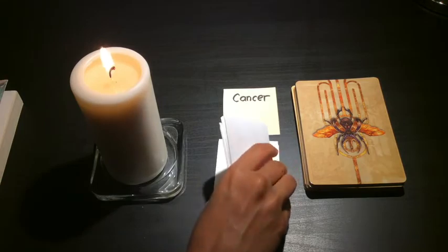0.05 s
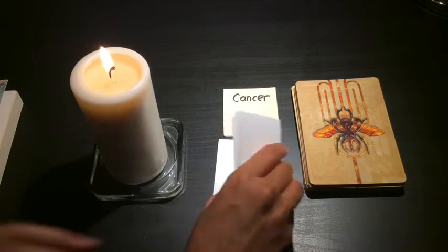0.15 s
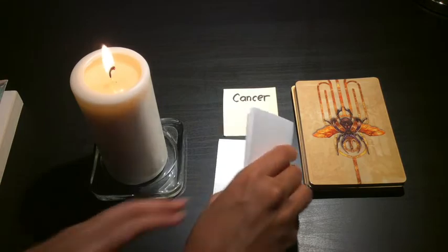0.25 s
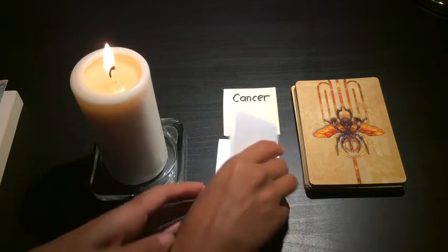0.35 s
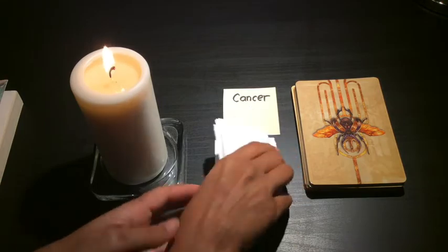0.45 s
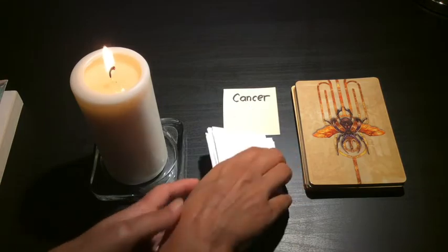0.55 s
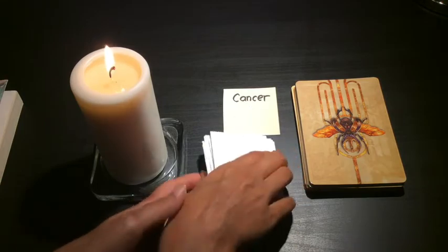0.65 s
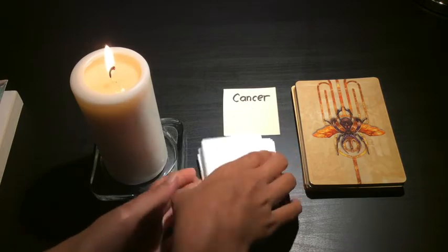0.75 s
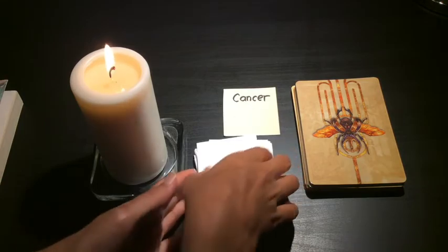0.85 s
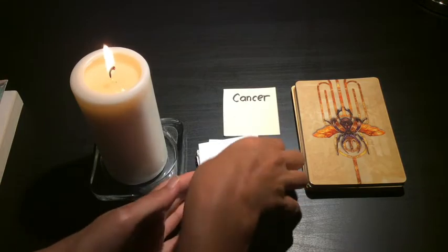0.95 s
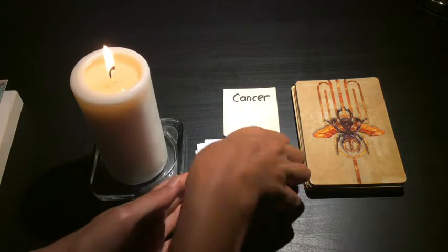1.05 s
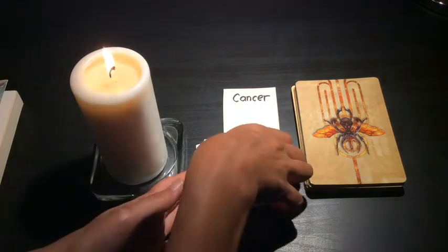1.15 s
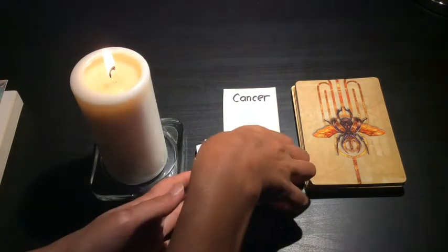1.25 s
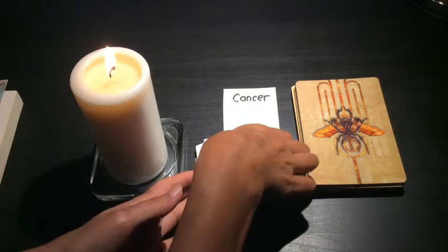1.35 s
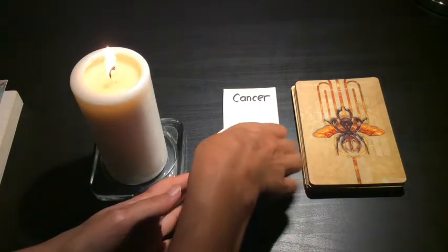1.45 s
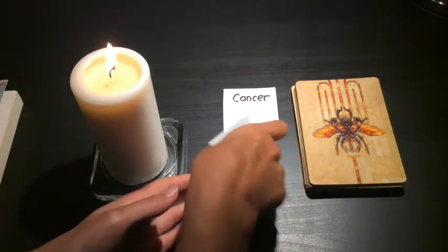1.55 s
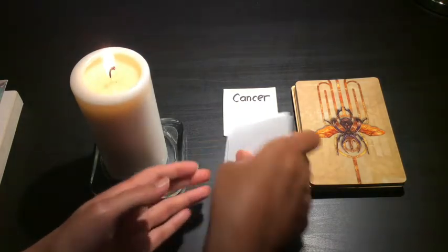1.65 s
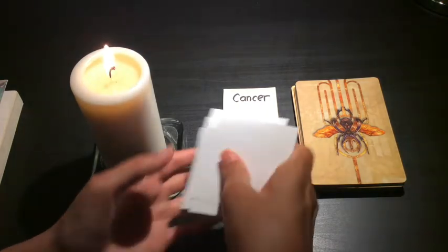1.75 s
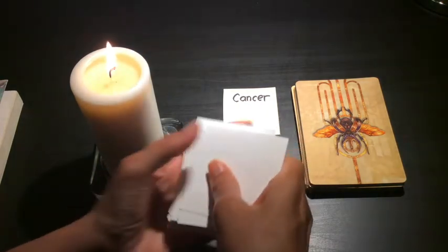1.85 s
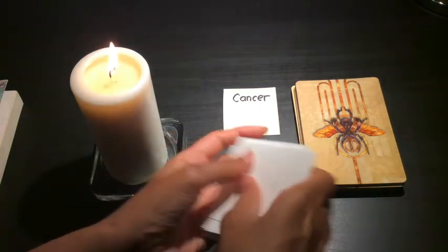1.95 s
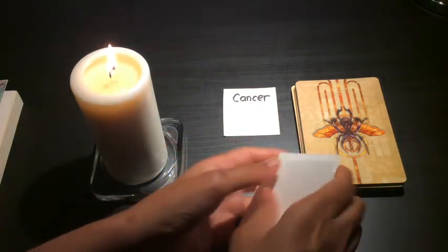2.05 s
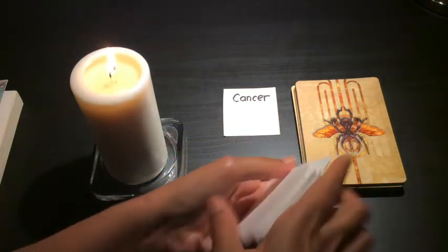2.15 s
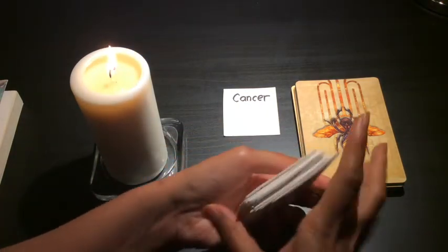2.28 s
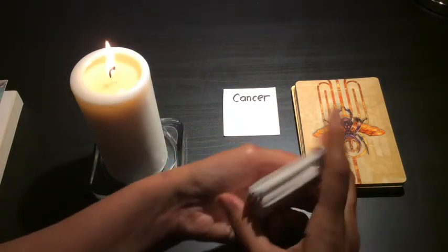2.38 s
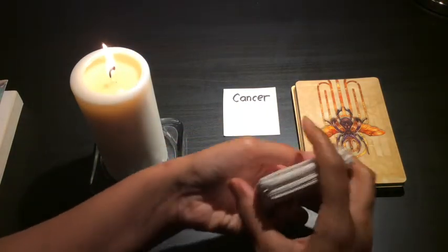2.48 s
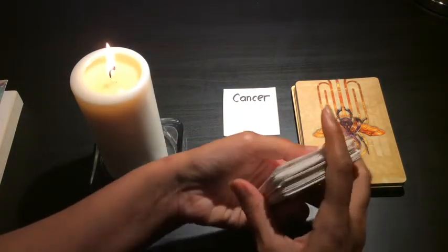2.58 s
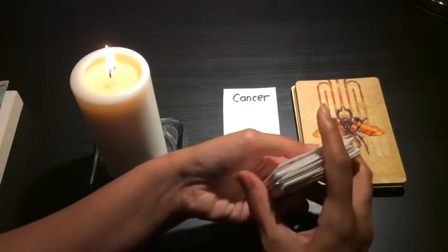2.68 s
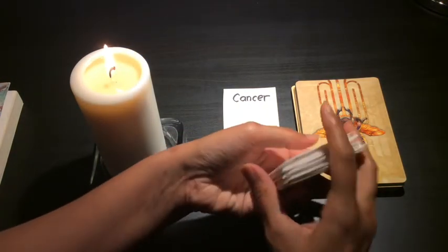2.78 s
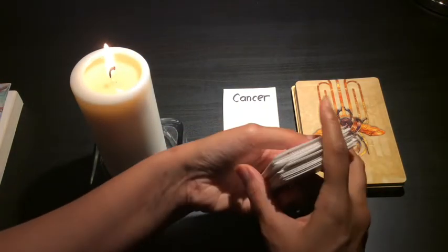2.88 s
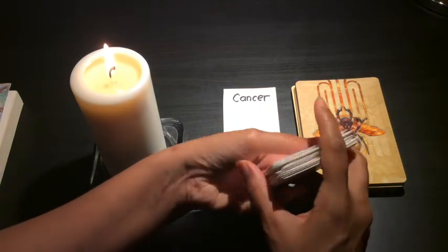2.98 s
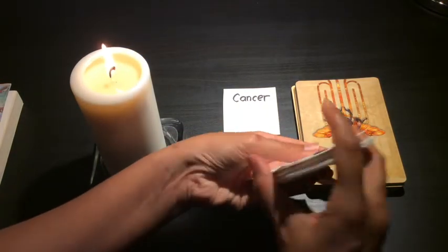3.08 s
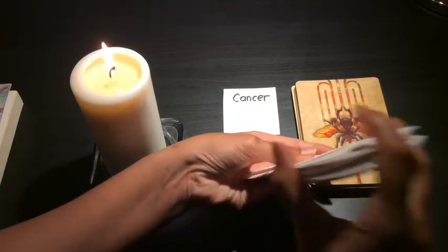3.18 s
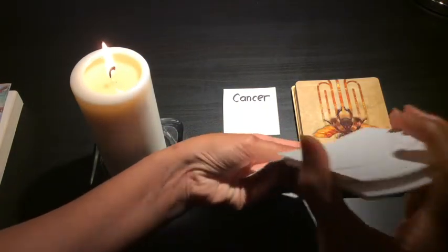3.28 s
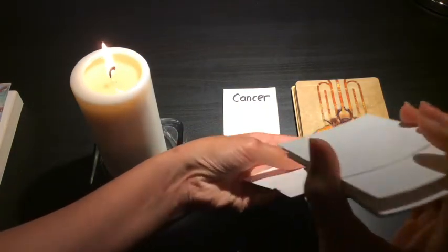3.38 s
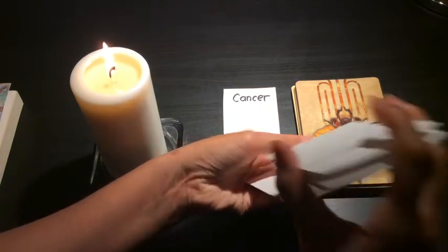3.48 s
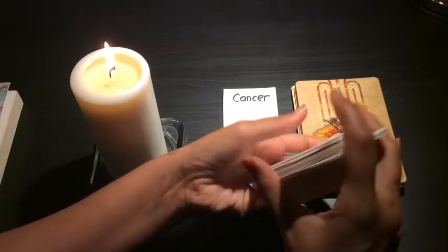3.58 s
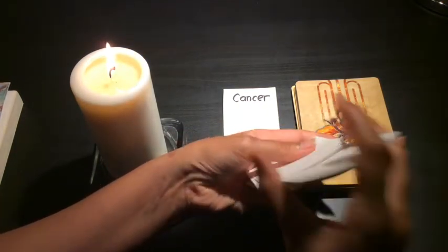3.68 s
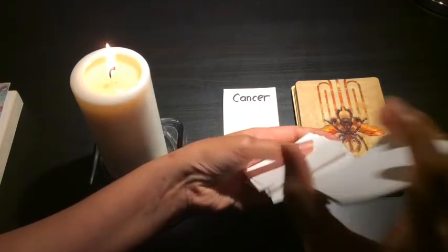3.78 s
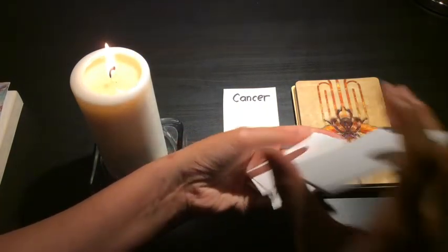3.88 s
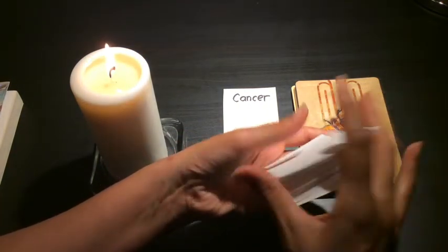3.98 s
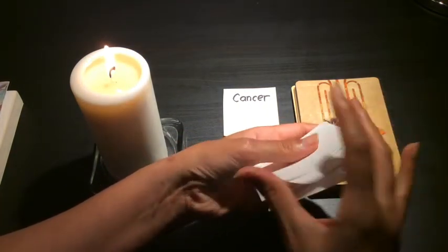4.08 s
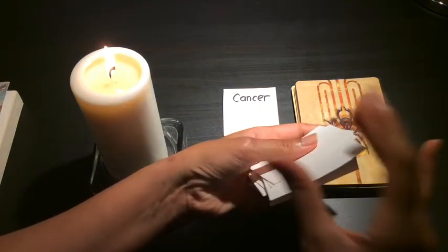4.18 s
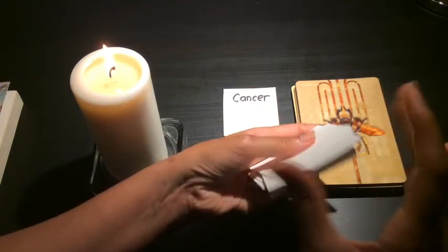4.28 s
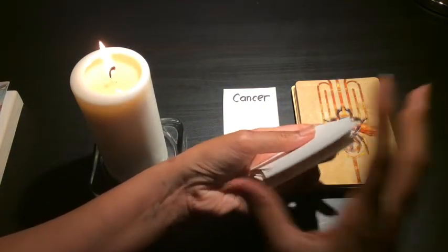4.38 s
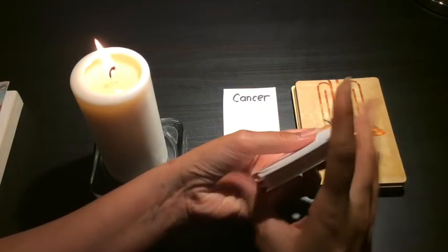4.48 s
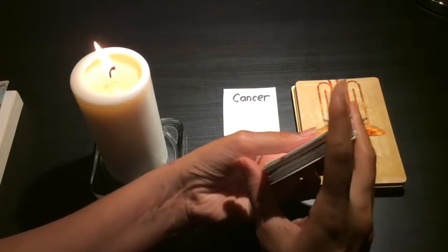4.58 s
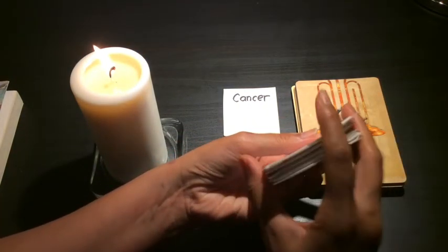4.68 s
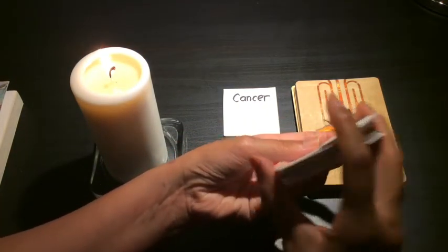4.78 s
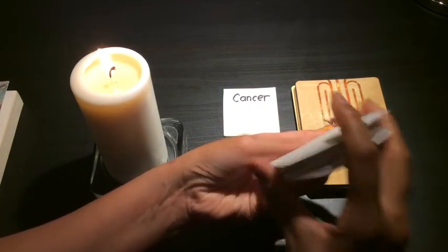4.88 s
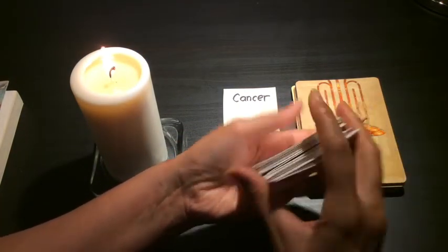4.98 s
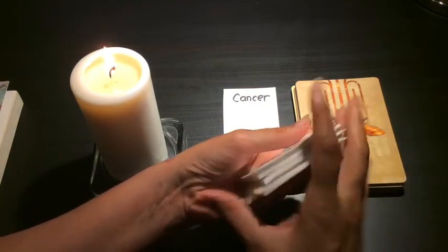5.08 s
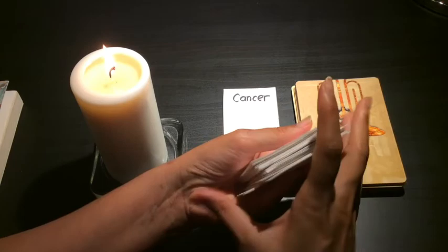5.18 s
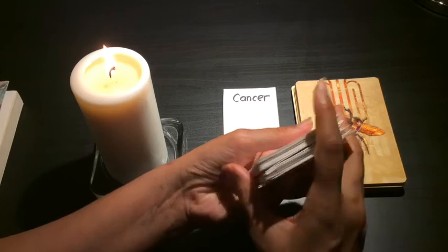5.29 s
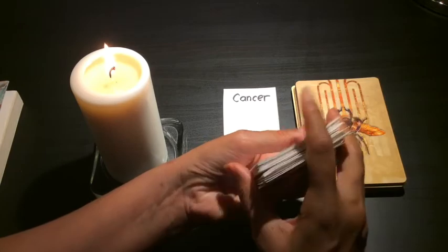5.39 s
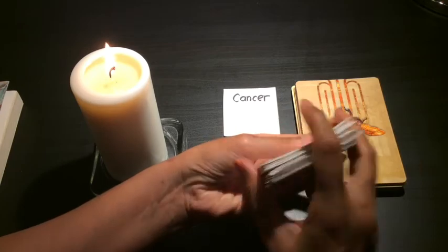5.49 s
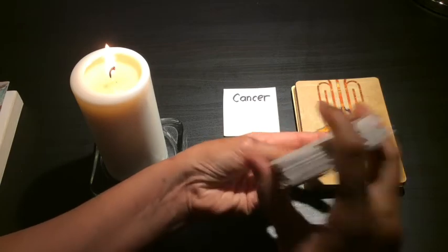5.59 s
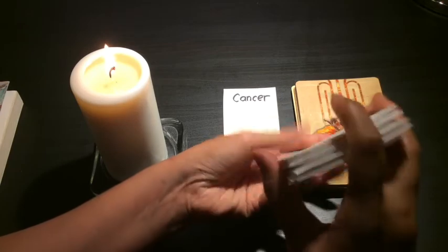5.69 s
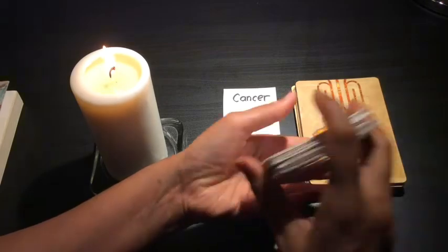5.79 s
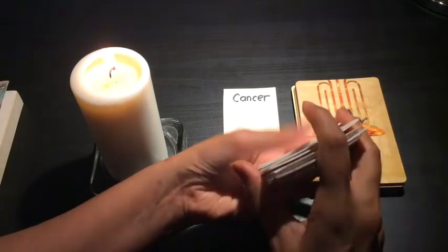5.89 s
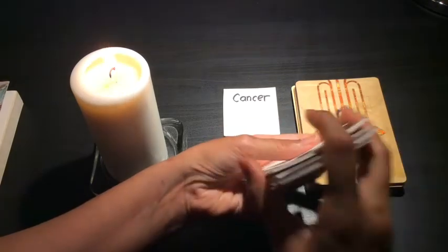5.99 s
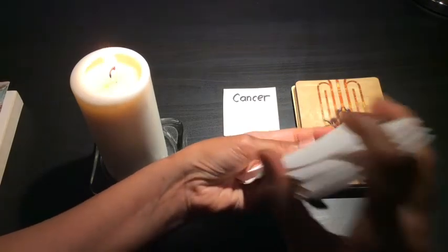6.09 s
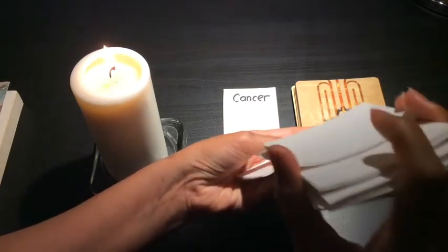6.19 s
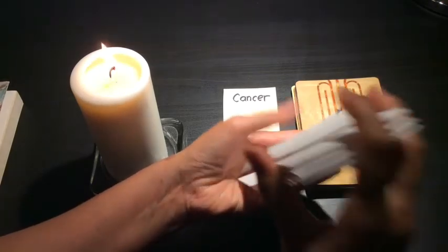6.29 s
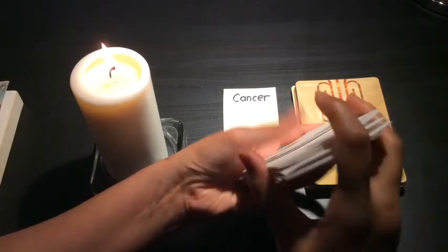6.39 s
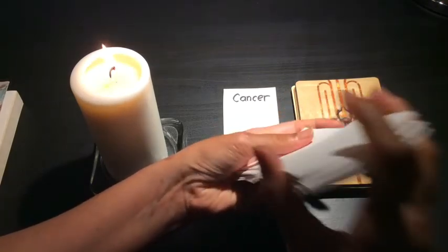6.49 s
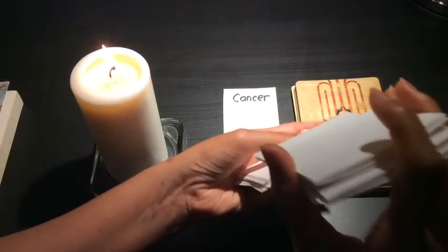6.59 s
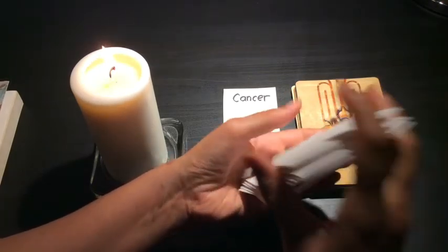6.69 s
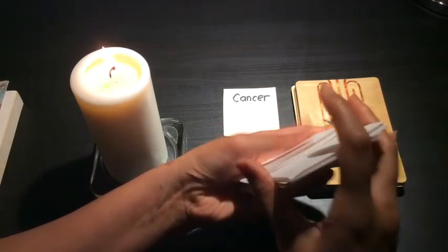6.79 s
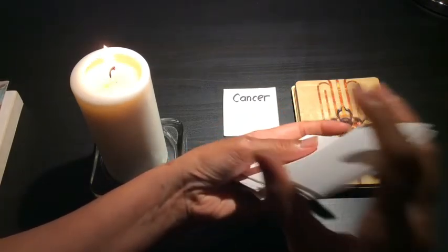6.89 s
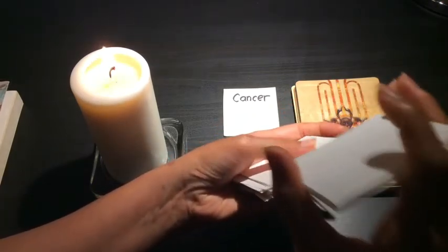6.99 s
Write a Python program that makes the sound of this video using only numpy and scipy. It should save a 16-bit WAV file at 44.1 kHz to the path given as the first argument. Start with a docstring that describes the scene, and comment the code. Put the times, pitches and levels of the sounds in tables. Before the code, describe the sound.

Close in a small dry room, over a very faint, even, low hush, a deck of paper cards ends a short scuff on a wooden table at 0 s. Near 0.5 s it drops edge first and falls flat, a sharp woody double knock with a papery slap and low table thump. From 0.65 to 1.3 s uneven scuffs rasp and ring the wood, with soft hand bumps and, around 1.15 s, four quick weakening knocks. A last scrape comes at 1.55 s, a flick at 1.8 s as the deck is lifted. From 2 s light swishes and pats begin the overhand shuffle. A long hiss lands with a pat at 3.3 s; a loud bright snap at 3.67 s precedes a strong clap at 3.8 s. Smaller slides, ticks and pats follow from 4 to 5.7 s, then brisk bright swishes near 6.2, 6.45 and 6.8 s, and a final pat just before 7 s.

```python
"""A deck of paper cards is shoved over a wooden table, drops onto it and is pushed together with a chatter.
The wood rings under the deck, edges rasp, and bumps of the hand sway the table.
Then the cards are scooped up and shuffled overhand: sliding paper hisses with tiny catches of its fibres,
card edges flick, and packets pat onto the pile in the palm.
All of it is heard close by in a small dry room, over a faint even hush."""
import sys
import numpy as np
from scipy import signal
from scipy.fft import rfft, irfft
from scipy.io import wavfile

SR = 44100
rng = np.random.default_rng(int(sys.argv[2]) if len(sys.argv) > 2 else 0)


def transcribe(u):
    """Save the signal u as a 16-bit wav file named by the first command-line argument.

    u: samples, shape (n,) or (channels, n), limited to [-1, 1]; the rate is SR.
    q: integer samples, one column per channel.
    """
    v = np.clip(np.atleast_2d(u).T, -1, 1)
    q = np.round(v * 32767).astype(np.int16)
    wavfile.write(sys.argv[1], SR, q)


N = 310854  # length in samples
T = np.arange(N) / SR  # time in seconds
RING = T[:int(.3 * SR)]  # time within one short sound, in seconds


def undb(db):
    """Turn decibels into gain."""
    return 10 ** (np.asarray(db) / 20)


def unit(x):
    """Scale to an rms of 1."""
    return x / np.sqrt(np.mean(x ** 2))


def blow(x):
    """Scale a short sound to the energy of 10 ms at an rms of 1."""
    return x / np.sqrt(np.sum(x ** 2) / (SR / 100))


def fade(t60):
    """Die away by 60 dB in t60 seconds."""
    return np.exp(-np.log(1000) * RING / t60)


def colour(x, points):
    """Filter to a (pitch_hz, level_db) outline, without any sound before its cause."""
    size = 4096
    hz, db = np.transpose(points)
    bins = np.maximum(np.fft.rfftfreq(size, 1 / SR), 1)
    outline_db = np.interp(np.log(bins), np.log(hz), db)
    # folding the cepstrum forward in time gives the filter its minimum delay
    cepstrum = irfft(np.log(undb(outline_db)))
    cepstrum[1:size // 2] *= 2
    cepstrum[size // 2 + 1:] = 0
    response = irfft(np.exp(rfft(cepstrum)))[:size // 2]
    return signal.oaconvolve(x, response)[:len(x)]


def soften(x, hz, order=2):
    """Low-pass: a soft contact pushes for longer."""
    return signal.sosfilt(signal.butter(order, hz, fs=SR, output="sos"), x)


def resonate(x, hz, q):
    """Bring out one broad resonance; a low q makes it broader."""
    return signal.lfilter(*signal.iirpeak(hz, q, fs=SR), x)


def burst(t60):
    """Make a quickly dying cluster of tiny contacts from noise."""
    return rng.standard_normal(len(RING)) * (fade(t60) + 1e-12)


def mode_waves(modes):
    """Make one decaying sine for each mode of an object."""
    return np.array([undb(db) * fade(t60) * np.sin(2 * np.pi * hz * RING) for hz, db, t60 in modes])


def ring(waves, spread):
    """Each blow lands on another spot and weights the modes anew, by a spread in dB."""
    signs = rng.choice([-1, 1], len(waves))
    weights = undb(spread * rng.standard_normal(len(waves))) * signs
    return blow(weights @ waves)


def add(out, s, sound):
    """Mix a sound in at time s in seconds."""
    i = int(s * SR)
    out[i:i + len(sound)] += sound[:len(out) - i]


def walk(rate):
    """Wander at random between rate points a second, scaled to an rms of 1."""
    knots = rng.standard_normal(N // 20)
    return unit(np.interp(T * rate, np.arange(len(knots)), knots))


def friction(catch_rate, size_db, smooth, judder_db, judder_rate):
    """Fibres catch and let go at random over a smooth rub; the finger pressure judders."""
    rub = rng.standard_normal(N)
    chance = rng.random(N) * SR / catch_rate  # below 1 about catch_rate times a second
    caught = chance < 1
    rarity = np.minimum(-np.log(chance[caught]), 5)
    catches = np.zeros(N)
    catches[caught] = np.sign(rub[caught]) * undb(size_db * rarity)
    judder = undb(judder_db * walk(judder_rate))
    return (unit(catches) + smooth * rub) * judder


# a stroke begins and ends this far under its peak; exponent of its rounding
STROKE_DB, STROKE_CURVE = 17.5, 1.46


def strokes(rows):
    """Each stroke speeds up and slows down in one arc; returns the gains of its main and second voice."""
    main, second = np.zeros(N), np.zeros(N)
    for fastest, rise, fall, db, second_db in rows:
        start = max(int((fastest - 2 * rise) * SR), 0)
        near = slice(start, int((fastest + 2 * fall) * SR))
        t = T[near] - fastest
        distance = np.maximum(-t / rise, t / fall)
        power = undb(db - STROKE_DB * distance ** STROKE_CURVE) ** 2
        main[near] += power
        second[near] += power * undb(second_db) ** 2
    return np.sqrt(main), np.sqrt(second)


# tone of the quiet air: pitch_hz, level_db
AIR_TONE = [(20, -16), (40, -2.5), (65, 3.5), (115, 3), (180, 1), (350, -1.5), (800, -9.5), (2000, -13.5),
            (5000, -14.5), (10000, -13.5), (16000, -18.5)]


def hush():
    """Steady noise, shaped in tone, gives a faint even hush."""
    return undb(-67) * unit(colour(rng.standard_normal(N), AIR_TONE))


def room(dry, wet_db, low_t60, high_t60, bounce):
    """A first bounce comes off the table, then the short tail of the walls, longer in the lows."""
    low = soften(burst(low_t60), 1900)
    tail = (1.3 * low + burst(high_t60)) * np.minimum(RING / 0.0063, 1)  # builds up over 6.3 ms
    tail *= undb(wet_db) / np.sqrt(np.sum(tail ** 2))
    tail[0] += 1  # the direct sound
    tail[int(.0016 * SR)] += bounce
    return signal.oaconvolve(dry, tail)[:N]


# slow sway of the whole table: pitch_hz, level_db, fade_by_60_db_s
TABLE_SWAY = [(61.7, -9, 0.4), (82.5, -2.5, 0.055), (119.7, 6.5, 0.13), (160, -3.5, 0.1)]
# the hand or wrist bumps the table: start_s, level_db (before a shared trim), contact_cutoff_hz
HAND_BUMPS = [(0.477, -40, 202), (0.698, -52.5, 200), (0.834, -48, 169), (1.013, -52, 170),
              (1.143, -48, 240), (1.348, -58.5, 200), (1.597, -51.5, 298), (2.76, -44.5, 90)]


def hand_bumps():
    """A soft bump of the hand sways the whole table; its soft contact dulls the sound."""
    out = np.zeros(N)
    frame = mode_waves(TABLE_SWAY)
    low_cut = signal.butter(3, 48, "high", fs=SR, output="sos")
    for s, db, contact_hz in HAND_BUMPS:
        sway = signal.sosfilt(low_cut, ring(frame, spread=1))
        add(out, s, undb(db + 2.5) * blow(soften(sway, contact_hz, order=3)))
    return out


# the deck meets the table edge first, falls flat and clatters:
# start_s, level_db, contact_time_s, card_slap_db (relative)
DECK_FALL_KNOCKS = [(0.4757, -34, 0.000089, -1.5), (.479, -33, 0.00062, -13), (0.4889, -45, 0.00024, 7.5),
                    (.495, -38.5, 0.00033, -2.5), (.508, -46.5, .0003, 1)]
# pushed together, the deck chatters on the wood in even, weakening knocks
CHATTER_START_S, CHATTER_PERIOD_S, CHATTER_COUNT = 1.1397, .0344, 4
CHATTER_DB, CHATTER_STEP_DB, CHATTER_CONTACT_S, CHATTER_SLAP_DB = -38, -2.5, 0.0096, -15


def knocks():
    """List the fall of the deck, then its chatter, in the columns of the fall."""
    rows = list(DECK_FALL_KNOCKS)
    for k in range(CHATTER_COUNT):
        s = CHATTER_START_S + k * CHATTER_PERIOD_S
        db = CHATTER_DB + k * CHATTER_STEP_DB
        rows.append((s, db, CHATTER_CONTACT_S, CHATTER_SLAP_DB))
    return rows


# ring of the table top: pitch_hz, level_db, fade_by_60_db_s
TABLE_RING = [(130, -15, 0.19), (261.4, 0.5, 0.15), (333, -5, 0.13), (397, -12, 0.2), (474.4, -1.5, 0.24),
              (526, 2.5, 0.12), (612.5, -3, 0.15), (733, 5.5, 0.18), (782, -7.5, 0.18), (907, -0.5, 0.17),
              (1033, -10, 0.43), (1129, -6.5, 0.3), (1300, -16.5, 0.19)]
# the deck's own stiff resonances: pitch_hz, level_db, fade_by_60_db_s
DECK_RING = [(1366, 2.5, 0.085), (1678, 7, 0.038), (2065, -7, 0.096), (2600, -8.5, 0.21), (2920, -12, 0.16),
             (3070, -5, 0.043), (3600, -17, 0.18), (4178, 0, 0.093), (4630, -10, 0.11), (5440, -19, 0.133)]
# tone of the slapping cards: pitch_hz, level_db
SLAP_TONE = [(200, -11), (1000, 7.5), (2200, -5.5), (3600, 1.5), (5500, -7.5), (8000, -16), (16000, -26)]


def deck_knocks():
    """The deck thuds on the ringing table top with a slap of its cards."""
    out = np.zeros(N)
    top, deck = mode_waves(TABLE_RING), mode_waves(DECK_RING)
    for s, db, contact_s, slap_db in knocks():
        press = 1 - np.exp(-(RING / contact_s) ** 2)  # fanned edges meet the wood one after another
        thud = resonate(resonate(burst(t60=0.016), 480, q=1.67), 576, q=1.33)
        thud = blow(thud * press)
        wood = blow(soften(thud + 0.72 * ring(top, spread=0.81) * press, 1040))
        cards = blow(colour(burst(t60=0.056), SLAP_TONE))
        slap = blow((cards + .5 * ring(deck, spread=3.3)) * press)
        add(out, s, undb(db) * (wood + undb(slap_db) * slap))
    return out


# the deck is shoved over the table: fastest_s, speeding_up_s, slowing_down_s,
# level_db, edge_rasp_db (relative, before a trim of the rasp)
DECK_SHOVES = [(0.0, .03, 0.11, -57, -4.5), (.675, 0.037, 0.069, -56.5, -3), (.74, .06, 0.065, -61, 1),
               (.81, 0.052, 0.052, -52.5, -21), (.892, 0.099, 0.11, -48, -2.5),
               (1.082, 0.053, 0.052, -53, -2), (1.245, 0.065, 0.16, -48.5, -8.5),
               (1.555, 0.077, 0.075, -54, 1)]
# tone of the deck dragging on wood: pitch_hz, level_db
DRAG_TONE = [(40, -37), (120, -3.5), (230, -9.5), (400, -2.5), (550, -0.5), (780, -4), (1050, -12),
             (2000, -19.5), (6000, -39)]
# tone of the rasping edges: pitch_hz, level_db
RASP_TONE = [(300, -34), (900, 1.5), (1300, 4), (2200, -2.5), (4400, -6), (6000, -14), (10000, -31),
             (16000, -51)]


def dragged_deck():
    """Card edges rasp on the wood in uneven scuffs and set both the deck and the table top ringing."""
    wood_gain, rasp_gain = strokes(DECK_SHOVES)
    scuff = unit(undb(.9 * walk(rate=45)))
    rub = scuff * friction(catch_rate=900, size_db=-1.0, smooth=0.97, judder_db=1.7, judder_rate=70)
    top = signal.oaconvolve(rub, ring(mode_waves(TABLE_RING), spread=1.0))[:N]
    wood = unit(unit(colour(rub, DRAG_TONE)) + 1.14 * unit(top))
    scrape = scuff * friction(catch_rate=1200, size_db=3.5, smooth=0.75, judder_db=2.5, judder_rate=90)
    deck = signal.oaconvolve(scrape, ring(mode_waves(DECK_RING), spread=0.64))[:N]
    rasp = unit(unit(colour(scrape, RASP_TONE)) + .5 * unit(deck))
    return wood_gain * wood + rasp_gain * rasp * undb(1.84)


# a card edge snaps free: start_s, level_db (before a shared trim), pitch_hz (where it is brightest)
EDGE_FLICKS = [(0.3735, -56, 4500), (1.806, -46.5, 4150), (3.6653, -44, 5500), (3.747, -51, 3800),
               (4.975, -49.5, 2683), (5.2427, -55.5, 4440), (5.3275, -57, 8000), (6.815, -40.5, 8000)]


def edge_flicks():
    """A card edge snaps free with a sharp tick and a short flutter."""
    out = np.zeros(N)
    for s, db, bright_hz in EDGE_FLICKS:
        snap = blow(burst(t60=0.001)) + blow(burst(t60=0.055))  # tick and flutter
        bright = resonate(resonate(snap, bright_hz, q=0.5), bright_hz, q=0.5)
        add(out, s, undb(db - 3.5) * blow(bright))
    return out


# resonances of the hollow between the cupped hands: pitch_hz, level_db
HAND_HOLLOW = [(120, 3), (270, 2.5), (440, -4), (700, 5), (980, -4.5), (1300, 0.5), (1700, -0.5),
               (2000, -1.5), (2400, -1), (2900, 1), (6000, 0.5)]
# a packet slides off the deck and lands on the pile in the palm (levels before shared trims):
# landing_s, slide_s, hiss_db, rustle_db (relative to hiss), clap_db, clap_pitch_hz,
# palm_thud_db (relative to clap), thud_pitch_hz
CARD_PACKETS = [(2.076, 0.046, -57.5, -7, -57.5, 950, -19, 250),
                (2.15, 0.034, -53.5, -10, -56.5, 1140, -13, 250),
                (3.3281, 0.22, -38, -16.5, -43.5, 810, -7.5, 374),
                (3.7911, 0.072, -45, -5.5, -36, 2000, -8.5, 393),
                (4.214, 0.086, -48, -12.5, -54.5, 1100, -13, 250),
                (4.246, 0.071, -47.5, -8.5, -46, 2000, -1, 200),
                (4.606, 0.014, -50.5, -8.5, -54.5, 2550, -22, 250),
                (5.044, 0.057, -47, -9.5, -55, 1510, -16, 250),
                (5.5591, 0.14, -55.5, -8.5, -55, 1330, -20, 250),
                (5.6738, 0.17, -54, -14.5, -52, 950, -6, 395),
                (6.1836, 0.25, -48.5, -9.5, -42.5, 1410, -8, 304),
                (6.59, 0.13, -49.5, -5.5, -50, 1120, -8, 348),
                (6.8544, 0.093, -52.5, -8, -50, 1610, -10, 250),
                (6.945, 0.092, -44.5, -4, -50.5, 1290, -6, 250)]
# the upper cards settle just after the clap
CLAP_T60_S, SETTLE_S, SETTLE_DB, SETTLE_T60_S = 0.046, .012, -10.5, 0.051


def packet_pats():
    """Packets clap the air out from between them and thud into the palm."""
    out = np.zeros(N)
    for s, _, _, _, db, clap_hz, palm_db, palm_hz in CARD_PACKETS:
        air = blow(burst(CLAP_T60_S))
        add(air, SETTLE_S, undb(SETTLE_DB) * blow(burst(SETTLE_T60_S)))
        clap = blow(resonate(resonate(air, clap_hz, q=1.0), clap_hz, q=0.5))
        palm = blow(resonate(resonate(burst(t60=0.048), palm_hz, q=0.91), palm_hz, q=0.64))
        add(out, s, undb(db - 1) * (clap + undb(palm_db) * palm))
    return colour(out, HAND_HOLLOW)


# a falling packet swells by this much and is fastest at this share of its way
SLIDE_SWELL_DB, SLIDE_PEAK_SHARE = 22, 0.7
# the pile brakes it from this long before it lands, and this fast
SLIDE_BRAKE_S, SLIDE_STOP_DB_PER_S = 0.0031, 523


def packet_slides():
    """A released packet speeds up, eases near the pile and stops on landing; gains of hiss and rustle."""
    hiss, rustle = np.zeros(N), np.zeros(N)
    for lands, length, db, rustle_db, *_ in CARD_PACKETS:
        near = slice(int((lands - 2 * length) * SR), int(lands * SR) + len(RING))
        t = T[near] - lands
        way = 1 + np.minimum(t, 0) / length  # 0 at the start, 1 on landing
        swell_db = SLIDE_SWELL_DB * (way / SLIDE_PEAK_SHARE - 1) ** 2
        brake_db = SLIDE_STOP_DB_PER_S * np.maximum(t + SLIDE_BRAKE_S, 0)
        power = undb(db - swell_db - brake_db) ** 2
        hiss[near] += power
        rustle[near] += power * undb(rustle_db) ** 2
    return np.sqrt(hiss), np.sqrt(rustle)


# the hands lift or square a packet, card brushing on card: fastest_s, speeding_up_s,
# slowing_down_s, hiss_db, rustle_db (relative to hiss); both before shared trims
HAND_SWISHES = [(.26, .25, 0.22, -71.5, -13), (.78, 0.41, .12, -65, -3.5), (1.15, 0.056, .04, -61, 0),
                (1.55, 0.05, 0.082, -55, -3), (1.955, 0.046, 0.018, -66, 4),
                (1.985, 0.011, 0.026, -57, 1.5), (2.195, 0.098, 0.072, -53.5, -3.5),
                (2.409, 0.0093, .03, -64, 0), (2.488, 0.054, 0.031, -48, -6), (2.655, 0.21, 0.064, -64, 0),
                (2.81, 0.074, .07, -61, -1.5), (2.893, 0.035, 0.047, -52.5, -7),
                (3.09, 0.091, 0.16, -64.5, 3), (3.445, 0.031, 0.033, -64, -2),
                (3.667, 0.0056, 0.051, -34, -8), (4.045, 0.0067, .02, -57, -14),
                (4.064, 0.028, 0.058, -49, -11.5), (4.096, 0.012, 0.042, -46.5, -8.5),
                (4.563, 0.01, 0.1, -55.5, -7.5), (4.76, 0.11, 0.091, -64, 1),
                (4.865, 0.15, 0.13, -50.5, -11), (5.06, 0.026, 0.024, -41.5, -5.5),
                (5.135, 0.074, 0.09, -58.5, -6.5), (5.334, 0.013, 0.051, -47.5, -8.5),
                (5.935, 0.052, 0.028, -49.5, -4.5), (6.163, 0.048, .035, -38.5, -17),
                (6.442, 0.049, 0.049, -45, -7), (6.819, 0.011, 0.073, -39, -11)]
# tone of sliding paper faces: pitch_hz, level_db
HISS_TONE = [(500, -37), (1500, -23), (3000, -8), (4500, -3), (7000, -1), (10000, 0), (13000, -0.5),
             (16000, -5)]
# tone of bending sheets: pitch_hz, level_db
RUSTLE_TONE = [(50, -11), (130, -5), (300, -9), (700, -10.5), (1000, -5), (1500, -1), (2800, -3),
               (4000, -2.5), (6000, -6.5), (12000, -42.5)]


def sliding_cards():
    """Paper faces hiss; bending sheets add a lower, grainier rustle whose resonances shift with the grip."""
    hiss_gain, rustle_gain = np.hypot(strokes(HAND_SWISHES), packet_slides())
    shove_gain, _ = strokes(DECK_SHOVES)
    hiss_gain = np.hypot(hiss_gain, undb(-17) * shove_gain)  # shoved cards shift on each other
    faces = friction(catch_rate=9700, size_db=-0.5, smooth=1.07, judder_db=1.87, judder_rate=110)
    hiss = colour(faces, HISS_TONE)
    # the moving hand reflects the hiss a moment later, with a wandering delay in seconds
    hand_lag = 0.0006 * undb(2.36 * walk(rate=2.5))
    echo = np.interp(np.arange(N) - hand_lag * SR, np.arange(N), hiss)
    hiss = unit(hiss + 0.15 * echo)
    grain = friction(catch_rate=2200, size_db=1.8, smooth=0.54, judder_db=1.6, judder_rate=80)
    rub = colour(grain, RUSTLE_TONE)
    sheets = sum(resonate(rub, hz, q=7.3) * walk(rate=18) for hz in (1466, 1990, 3100, 4050))
    rustle = unit(colour(rub + 0.99 * sheets, HAND_HOLLOW))
    return hiss_gain * hiss * undb(0.5) + rustle_gain * rustle * undb(0.13)


def scene():
    """Put cards and table in the room, over the hush; the same in both ears."""
    table = hand_bumps() + deck_knocks() + dragged_deck()
    cards = edge_flicks() + packet_pats() + sliding_cards()
    mono = room(table + cards, wet_db=-14, low_t60=0.38, high_t60=0.34, bounce=0.034) + hush()
    return np.array([mono, mono])


def record(dry):
    """Cut the top of the treble steeply, above 15850 Hz."""
    return signal.sosfilt(signal.ellip(10, .2, 70, 15850, fs=SR, output="sos"), dry)


dry = scene()
out = record(dry)
transcribe(out)
```